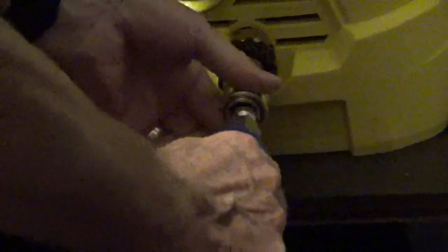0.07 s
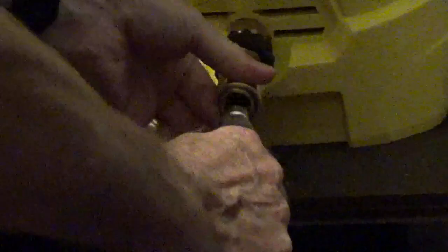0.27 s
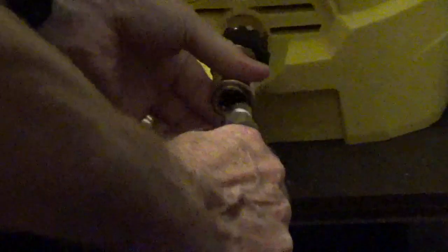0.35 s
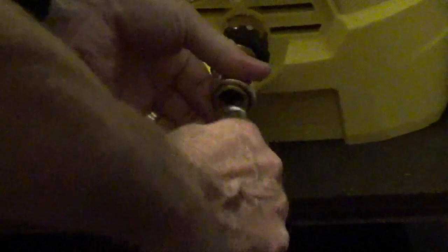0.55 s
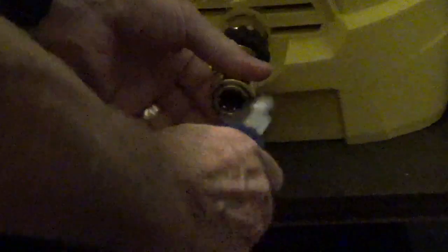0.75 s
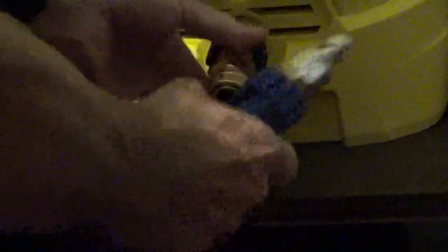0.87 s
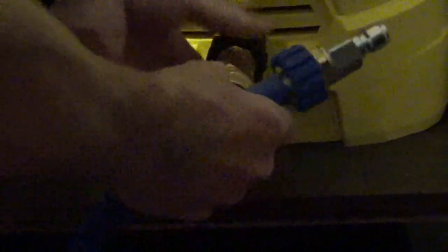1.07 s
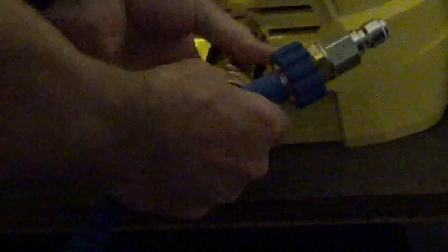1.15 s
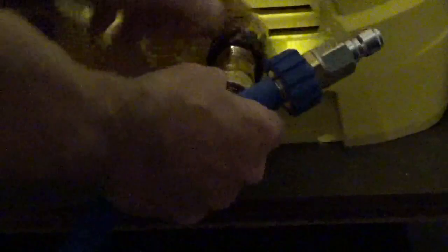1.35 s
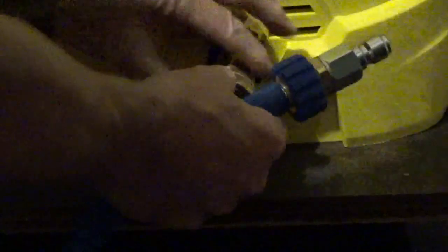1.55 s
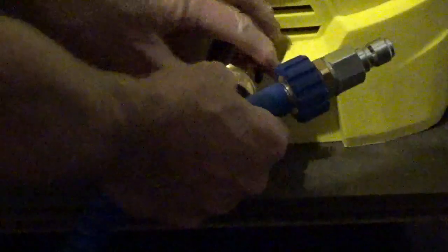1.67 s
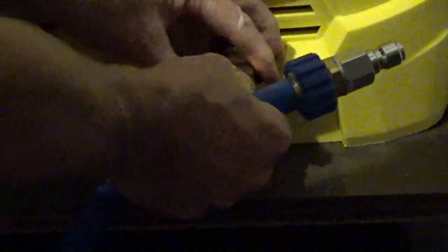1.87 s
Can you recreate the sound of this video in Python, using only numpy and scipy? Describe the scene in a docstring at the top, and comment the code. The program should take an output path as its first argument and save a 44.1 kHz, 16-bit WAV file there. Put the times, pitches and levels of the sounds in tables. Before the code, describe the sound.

A metal hose coupling is handled on a hollow plastic machine. Faint hum, then rumbling drag and a click at 0.14 s; scraping with short hollow rubbing tones swells around 0.3 s. A clack and cluster of dull knocks comes at 0.54-0.65 s, then lighter fumbling. Sharp scrapes, clicks and knocks return at 1.3 and 1.45 s, thinning to small taps by 1.76 s. Close, dry, small room.

```python
"""A faint room hum comes first; almost at once a rumbling drag joins, then scrapes, clicks and knocks.
Hands work a brass quick coupling on a hollow plastic machine housing in a small quiet room.
Hose and fingers drag on the housing: random slips excite its modes, and at times a rub holds one hollow tone.
Metal parts scrape as fine grit and click as short noise bursts through brass modes, with single pings.
Knocks excite the housing modes and add decaying sines; short feedback delays make the room."""
import sys
import numpy as np
from scipy import signal
from scipy.fft import rfft, irfft, next_fast_len
from scipy.io import wavfile

SR = 44100
rng = np.random.default_rng(int(sys.argv[2]) if len(sys.argv) > 2 else 0)


def pcm_store(signal):
    """Save signal as 16-bit PCM."""
    levels = np.round(np.clip(np.atleast_2d(signal), -1, 1) * 32767)
    wavfile.write(sys.argv[1], SR, levels.astype(np.int16).T)


N = 83790  # samples


def amp(db):
    """Decibel law: level [dB] to amplitude ratio."""
    return 10 ** (np.asarray(db) / 20)


def rms_one(x):
    """Power normalisation: scale to an rms value of 1."""
    return x / np.sqrt(np.mean(x ** 2) + 1e-20)


def in_time(rows):
    """Linear interpolation: each level column of a time table at every sample."""
    time_s, *columns = np.transpose(rows)
    return [np.interp(np.arange(N) / SR, time_s, column) for column in columns]


def time_since(start_s):
    """Causality: one row per event, holding the time since its start [s], zero before it."""
    return np.maximum(np.arange(N) / SR - np.asarray(start_s)[:, None], 0)


def filtered(x, order, edge_hz, kind):
    """Butterworth filtering: a maximally flat passband."""
    return signal.sosfilt(signal.butter(order, edge_hz, kind, fs=SR, output="sos"), x)


def colour(x, points):
    """Spectral shaping: weight noise by levels interpolated over log frequency."""
    hz = np.maximum(np.arange(x.shape[-1] // 2 + 1) * SR / x.shape[-1], 1)
    point_hz, point_db = np.transpose(points)
    gain = amp(np.interp(np.log(hz), np.log(point_hz), point_db))
    return irfft(rfft(x) * gain, x.shape[-1])


def drift(rate_hz):
    """Low-pass random process: two equal poles leave slow fluctuations of rms 1."""
    pole = np.exp(-2 * np.pi * rate_hz / SR)
    settle = 9000  # samples dropped while the filter settles
    noise = rng.standard_normal(N + settle)
    return rms_one(signal.lfilter([1], [1, -2 * pole, pole * pole], noise)[settle:])


def grains(per_s, spread_db, flutter_db):
    """Stick-slip as shot noise: random impulses of uneven size and fluttering strength, rms 1."""
    sizes = amp(spread_db * np.minimum(rng.exponential(1, N), 4)) * rng.choice([-1, 1], N)
    happens = rng.random(N) < per_s / SR
    return rms_one(sizes * happens * amp(flutter_db * drift(20.3)))


def resonate(x, modes):
    """Modal superposition: parallel resonances of alternating sign, with unit power gain for white noise."""
    def bank(drive):
        total = 0
        for k, (hz, width_hz, db) in enumerate(modes):
            r = np.exp(-np.pi * width_hz / SR)  # pole radius
            poles = [1, -2 * r * np.cos(2 * np.pi * hz / SR), r * r]
            mode = signal.lfilter([1 - r, 0, r - 1], poles, drive + 1e-18)
            total = total + (-1) ** k * amp(db) * mode
        return total
    impulse = np.arange(8192) == 0
    return bank(x) / np.sqrt(np.sum(bank(impulse) ** 2))


def bursts(start_s, db, t60_s):
    """Exponential decay: envelopes that rise fast and fall by 60 dB in t60."""
    rise_s = 0.00076
    t = time_since(start_s)
    fall_db = 60 * t / np.asarray(t60_s)[:, None]
    return np.sum((1 - np.exp(-t / rise_s)) * amp(np.asarray(db)[:, None] - fall_db), axis=0)


def strikes(start_s, db, hz, width_hz):
    """Critically damped envelope: each sine swells to the level db during contact, then dies."""
    t = time_since(start_s)
    age = np.pi * np.reshape(width_hz, (-1, 1)) * t
    envelope = amp(db)[:, None] * age * np.exp(1 - age)
    return np.sum(envelope * np.sin(2 * np.pi * hz[:, None] * t), axis=0)


# relative spectrum of the room noise: (frequency [Hz], spectral density [dB per Hz])
HUM_SPECTRUM = [(20, -18), (40, -5.5), (58, 3.5), (90, -1.5), (135, 1), (230, -3.5), (400, -12), (800, -13),
                (1300, -24), (3500, -55), (6000, -28), (8000, -29), (11200, -53)]
HUM_DB, HUM_SIDE_DB = -48, -31  # rms level; side part relative to the mid part


def room_hum():
    """Stationary coloured noise: low hum and hiss, highly correlated between the channels."""
    mid, side = colour(rng.standard_normal((2, N)), HUM_SPECTRUM)
    return amp(HUM_DB) * rms_one(mid + amp(HUM_SIDE_DB) * side * np.array([[1], [-1]]))


ROOM_T60_S, ROOM_DB = 0.042, -19.5  # low-frequency decay time; gain applied to the reflections
WALL_CUT_HZ = 18000  # sets the one-pole treble loss of each round


def room(x):
    """Recirculating reflections: six feedback delays a side, losing treble on every round."""
    size = next_fast_len(N + SR // 2)
    z = np.exp(-2j * np.pi * np.arange(size // 2 + 1) / size)  # delay of one sample
    dull = np.exp(-2 * np.pi * WALL_CUT_HZ / SR)
    wall = (1 - dull) / (1 - dull * z)
    out, spectrum = np.zeros((2, N)), rfft(x, size)
    lags = (rng.uniform(.002, .016, 12) * SR).astype(int)
    for k, lag in enumerate(lags):
        loop = amp(-60 * lag / SR / ROOM_T60_S) * wall * z ** lag
        echoes = irfft(spectrum * loop / (1 - loop), size)[:N]
        out[k % 2] += (-1) ** (k // 2) * echoes
    return out


# scraping of the metal parts: (time [s], low, middle and high treble level [dB])
SCRAPE = [(0, -68, -68, -70), (.1, -55.5, -69, -67), (0.133, -58, -58, -70), (0.141, -36, -34.5, -54),
          (.184, -43.5, -43, -54), (.232, -45, -42, -45.5), (0.324, -37, -37, -41), (.438, -48, -52.5, -59),
          (.535, -60, -59, -65), (0.544, -38.5, -52, -62), (.61, -46.5, -55, -60),
          (.68, -54.5, -61.5, -64.5), (.795, -62.5, -56, -55), (.83, -45, -45.5, -48.5),
          (.9, -51.5, -51.5, -53), (.95, -50.5, -53.5, -49), (1.0, -53, -55, -58.5),
          (1.098, -59.5, -63, -62), (1.111, -53.5, -54.5, -50.5), (1.19, -60, -63.5, -61),
          (1.279, -62.5, -62, -59), (1.294, -44, -51, -51), (1.305, -28.5, -32.5, -39),
          (1.344, -36.5, -48, -49), (1.386, -42.5, -44, -50), (1.446, -42, -42.5, -48),
          (1.462, -40, -34, -46), (1.486, -34.5, -40, -47.5), (1.612, -52, -56.5, -61),
          (1.64, -44, -47.5, -56), (1.708, -53, -57.5, -61), (1.75, -55, -56.5, -59.5),
          (1.9, -61.5, -65, -65)]
GRIT_PER_S, GRIT_SPREAD_DB, GRIT_FLUTTER_DB = 4500, 2.5, 0.5  # mean rate; size spread; rms flutter


def scrape_grit():
    """Friction as shot noise: dense grit impulses follow the scrape level of each band."""
    return [grains(GRIT_PER_S, GRIT_SPREAD_DB, GRIT_FLUTTER_DB) * amp(db) for db in in_time(SCRAPE)]


# metal clicks: (time [s], reference level [dB], low, middle and high treble re reference [dB],
# t60 [s], ping pitch [Hz], ping width [Hz], ping peak re reference [dB])
CLICKS = [(0.137, -16.5, -7, -7, -13, 0.031, 4200, 900, -1),
          (.538, -22.5, -11, -14, -23.5, 0.065, 2366, 130, -6.5),
          (0.5391, -27, -16, -24, -25, .04, 1660, 140, -3.5),
          (.686, -39, -8.5, -9, -13, 0.13, 7200, 600, 0.5), (.925, -33, -39, -25, -7, 0.076, 7700, 700, -5),
          (0.957, -30, -12, -14.5, -16, 0.075, 1600, 400, -2.5),
          (1.1, -38.5, -8.5, -15, -23, 0.089, 1760, 450, -6),
          (1.3007, -30, 2, 6.5, 4.5, 0.019, 4400, 400, 4),
          (1.318, -20, -9, -11.5, -17, 0.065, 6100, 700, -10),
          (1.4514, -11.5, -11, -15.5, -17.5, 0.041, 6040, 517, -2),
          (1.4667, -24.5, -4, -14, -19, 0.073, 5800, 345, -6),
          (1.529, -28, -18, -13, -9, 0.042, 2470, 450, -7),
          (1.619, -35, -5.5, -23, -18, 0.043, 3020, 300, -5),
          (1.634, -33.5, -7.5, -28, -16, 0.096, 2300, 300, 3)]


def click_bursts():
    """Impact as transient noise: sharp rattling bursts, one drive for each treble band."""
    time_s, db, *band_db, t60_s, _, _, _ = np.transpose(CLICKS)
    return [rng.standard_normal(N) * bursts(time_s, db + rel_db, t60_s) for rel_db in band_db]


def click_pings():
    """Free vibration after impact: one damped ping for each click."""
    time_s, db, _, _, _, _, hz, width_hz, ping_db = np.transpose(CLICKS)
    return strikes(time_s, db + ping_db, hz, width_hz)


# treble bands of the metal: (low edge [Hz], high edge [Hz])
METAL_BANDS = [(1150, 2950), (3650, 7000), (8100, 12500)]
# brass modes, one list per band: (frequency [Hz], width [Hz], relative level [dB])
BRASS_MODES = [
    [(1600, 100, 18.5), (2390, 33, 16), (2800, 250, 13.5)],
    [(5650, 290, -1), (6820, 1100, -4)],
    [(8650, 310, -10), (11900, 870, 18)],
]
BRASS_RING_DB = -6  # gain of the path through the modes


def metal():
    """Forced modal vibration: grit and clicks sound both broad in each band and through the brass modes."""
    out = click_pings()
    broad_drives, ring_drives = [
        [grit + burst for grit, burst in zip(scrape_grit(), click_bursts())] for _ in range(2)]
    for edges, modes, broad, ring in zip(METAL_BANDS, BRASS_MODES, broad_drives, ring_drives):
        power_match = np.sqrt(SR / 2 / (edges[1] - edges[0]))  # makes up the power lost to the band
        out = out + power_match * filtered(broad, 2, edges, "band")
        out = out + amp(BRASS_RING_DB) * filtered(resonate(ring, modes), 2, edges, "band")
    return out


# rubs that hold one hollow tone of the housing:
# (start [s], length [s], start pitch [Hz], end pitch [Hz], mid-rub rms level before flutter [dB])
RUBS = [(.055, 0.078, 710, 617, -34), (.14, 0.12, 264.1, 246, -32.5), (0.249, 0.1594, 390.7, 329.3, -26.5),
        (0.306, 0.033, 620, 614, -31), (0.477, 0.041, 610, 592, -35), (.49, 0.049, 790, 808, -36),
        (1.305, 0.043, 846, 740, -29)]
RUB_FLUTTER_DB, RUB_WAVER_HZ, RUB_UNREST_HZ = 2.2, 28, 45  # rms level and pitch unrest; its cutoff


def rubs():
    """Frequency modulation: each rub swells, holds a fluttering, gliding tone and fades."""
    start_s, length_s, from_hz, to_hz, db = np.transpose(RUBS)[:, :, None]
    part = np.clip((np.arange(N) / SR - start_s) / length_s, 0, 1)
    waver, flutter = np.array([[drift(RUB_UNREST_HZ) for _ in RUBS] for _ in range(2)])
    hz = from_hz + (to_hz - from_hz) * part + RUB_WAVER_HZ * waver
    phase = 2 * np.pi * np.cumsum(hz, axis=1) / SR
    swell = np.sqrt(2 * np.abs(np.sin(np.pi * part)))
    return np.sum(swell * amp(db + RUB_FLUTTER_DB * flutter) * np.sin(phase), axis=0)


# knocks on the housing: (time [s], ring peak before the low-pass [dB], strongest pitch [Hz], width [Hz],
# impulse into the deep, middle and upper modes [dB])
KNOCKS = [(.138, -26.5, 905, 121, -2, -30, -11), (.344, -18, 340, 50.4, -22, -14, -26),
          (0.5394, -14, 470, 93, -2.5, -13, -0.5), (.539, -16, 920, 50, -25, -20, -25),
          (0.5548, -17.5, 905, 149, -14, -2, -17), (.605, -12.5, 657, 60.7, -2, -12, -17),
          (.623, -16, 458, 102, -13, 6, -1), (0.6366, -20.5, 462, 170, -21, -24, -17),
          (.745, -24, 420, 89, -9, -6.5, -15), (1.104, -28.5, 745, 200, -19, -24, -9),
          (1.2825, -22, 608, 131, -30, -0.5, -7.5), (1.302, -17.5, 562, 118, 3, -21, -13),
          (1.4489, -19.5, 664, 131, -1, -4, -1), (1.4722, -17.5, 635, 180, -33, -25.5, -19),
          (1.538, -24, 614, 89.5, -16, -10, -15), (1.621, -30, 427, 46, -13, -16.5, -22),
          (1.76, -29.5, 453, 90, -14.5, -11.5, -18)]


def knock_rings():
    """Free vibration after impact: the strongest tone of each knock swells and dies."""
    time_s, db, hz, width_hz, *_ = np.transpose(KNOCKS)
    return strikes(time_s, db, hz, width_hz)


def knock_blows():
    """Impulsive excitation: single-sample blows for the deep, middle and upper modes."""
    time_s, _, _, _, *blow_db = np.transpose(KNOCKS)
    blows = np.zeros((3, N))
    blows[:, (time_s * SR).astype(int)] = amp(blow_db)
    return blows


# drag on the housing: (time [s], drive level of the lowest, deep, middle and upper modes [dB])
DRAG = [(0, -64, -61, -61, -48.5), (.052, -50, -62, -43.5, -63), (.075, -47, -42.5, -33, -37),
        (.115, -46, -37, -32, -53), (.132, -64, -46, -62, -48), (.145, -52, -34.5, -34, -32.5),
        (.2, -54, -34, -35, -40.5), (.26, -47, -28, -31, -31), (.32, -37.5, -27, -25.5, -27.5),
        (.35, -39, -24, -36, -27), (.385, -49, -33.5, -40, -36), (.42, -60, -39, -38, -39.5),
        (.478, -47.5, -37.5, -55, -45), (.495, -63, -23, -34, -42.5), (.515, -47, -40.5, -38, -43.5),
        (.534, -57, -33, -53, -31), (.546, -48, -31.5, -27, -29), (.58, -40, -29.5, -21.5, -26),
        (.615, -51, -22.5, -25.5, -26.5), (.66, -45, -39, -28.5, -36), (.74, -49, -42, -39.5, -47),
        (.76, -46, -40, -31.5, -49), (.8, -45.5, -31.5, -42.5, -39.5), (.846, -51, -30.5, -41, -33.5),
        (.94, -46.5, -40, -47, -46.5), (1.095, -57, -59.5, -64, -54), (1.112, -45, -45, -35.5, -42),
        (1.16, -53, -47, -50, -50.5), (1.278, -42, -47, -66, -54), (1.288, -45, -54, -31.5, -33),
        (1.316, -58, -29, -25, -27.5), (1.345, -43, -33.5, -32.5, -31), (1.38, -33, -37.5, -40, -36),
        (1.434, -39, -24.5, -33, -34.5), (1.475, -44, -37.5, -32, -29.5), (1.52, -45, -36, -49, -35.5),
        (1.55, -34.5, -30.5, -43, -36.5), (1.61, -64, -43, -47, -50), (1.634, -44, -32, -61, -45),
        (1.734, -42, -47, -48, -50.5), (1.762, -38, -43, -37.5, -46), (1.83, -51, -53, -59, -52),
        (1.9, -57, -48, -63, -62)]
SLIPS_PER_S, SLIP_SPREAD_DB, SLIP_FLUTTER_DB = 1400, 4, 1.08  # mean rate; size spread; rms flutter


def drag_slips():
    """Stick-slip friction: random slips follow the drag level of each mode group."""
    return [grains(SLIPS_PER_S, SLIP_SPREAD_DB, SLIP_FLUTTER_DB) * amp(db) for db in in_time(DRAG)]


# plastic housing modes, in four groups: (frequency [Hz], width [Hz], relative level [dB])
LOWEST_MODES = [(123.3, 24.4, -0.44), (180, 49, -1.6)]
DEEP_MODES = [(218, 20.5, -1), (255.7, 8.9, 1), (315.1, 22.8, 0), (354, 11.3, -0.5), (400.7, 44, -2.5)]
MIDDLE_MODES = [(470, 62, 0.5), (570, 17.5, 6), (629.6, 32, 5.5), (743, 30, 1)]
UPPER_MODES = [(820, 62, 2.5), (926, 87, -3), (1017.4, 49, -1), (1095, 115, -4), (1256, 350, -12)]


def housing():
    """Modal excitation: slips ring every group of plastic modes; knocks strike all but the lowest."""
    lowest_slips, *slips = drag_slips()
    out = resonate(lowest_slips, LOWEST_MODES) + knock_rings()
    for modes, slip, blow in zip((DEEP_MODES, MIDDLE_MODES, UPPER_MODES), slips, knock_blows()):
        below_hz = .7 * modes[0][0]  # trims the skirt under the first mode
        out = out + filtered(resonate(slip + blow, modes), 2, below_hz, "high")
    return filtered(out, 2, 1400, "low")


def scene():
    """Superposition: all sources centred, with their room reflections and the hum."""
    near = room_hum(), metal() + rubs() + housing()
    hum, sources = near
    return hum + amp(ROOM_DB) * room(sources) + sources


BASS_HZ, BASS_TILT_DB = 150, 1.6  # band centre; boost on the left


def record(dry):
    """Linear filtering: the bass band is raised left and lowered right; the top is cut."""
    bass = filtered(dry, 1, [BASS_HZ / 1.3, BASS_HZ * 1.3], "band")
    tilted = dry + (amp(BASS_TILT_DB) - 1) * bass * np.array([[1], [-1]])
    stop = signal.cheby2(12, 60, 12500, fs=SR, output="sos")  # 60 dB down from 12.5 kHz
    edge = signal.ellip(8, .3, 26, 10980, fs=SR, output="sos")  # steep edge at 10.98 kHz
    return signal.sosfilt(edge, signal.sosfilt(stop, tilted))


dry = scene()
out = record(dry)
pcm_store(out)
```